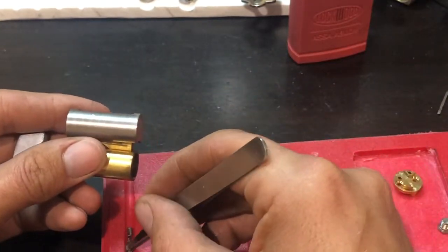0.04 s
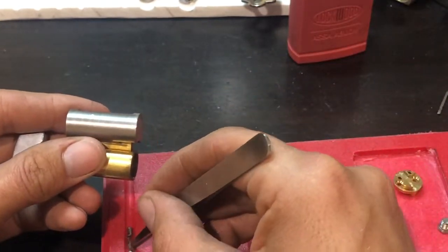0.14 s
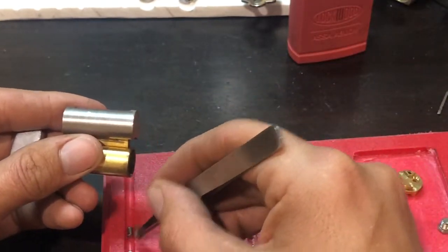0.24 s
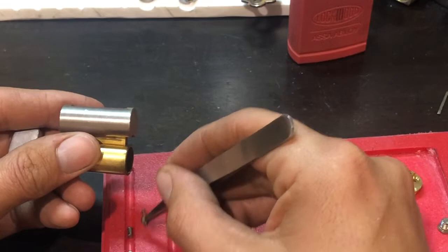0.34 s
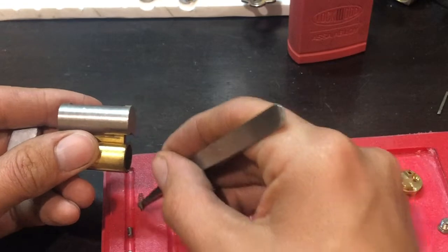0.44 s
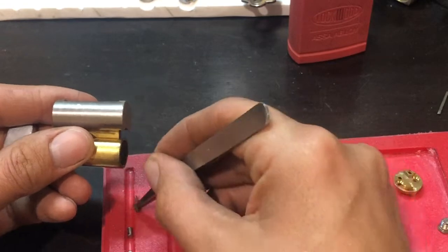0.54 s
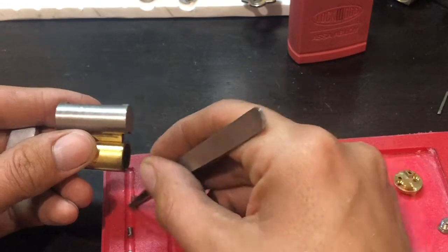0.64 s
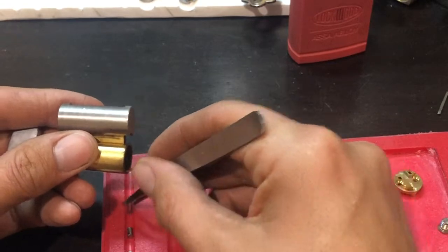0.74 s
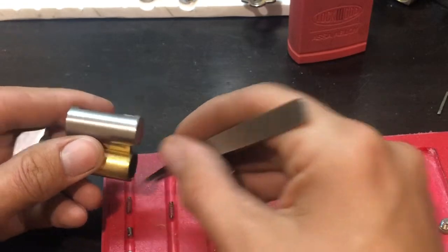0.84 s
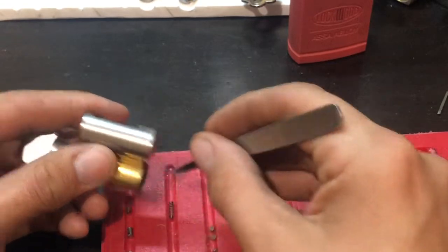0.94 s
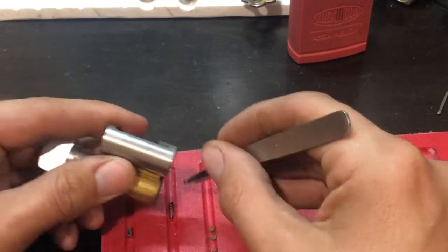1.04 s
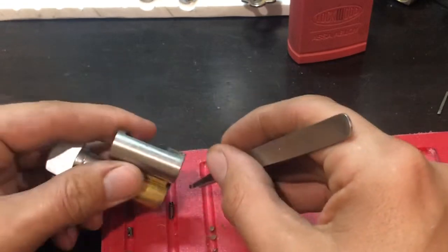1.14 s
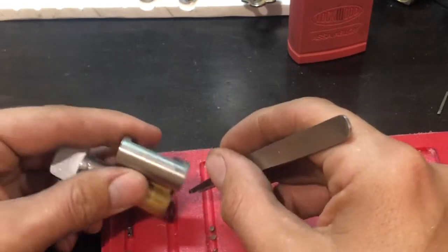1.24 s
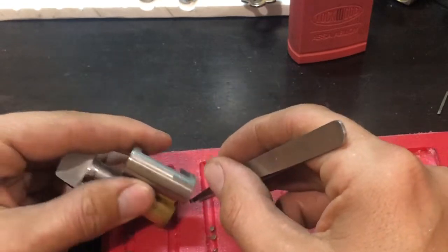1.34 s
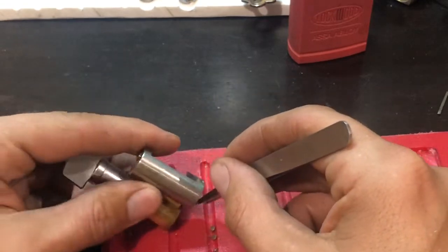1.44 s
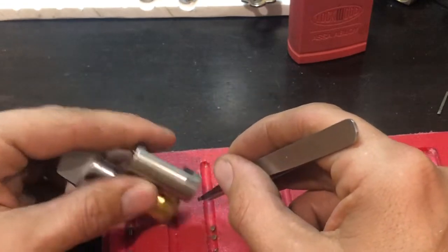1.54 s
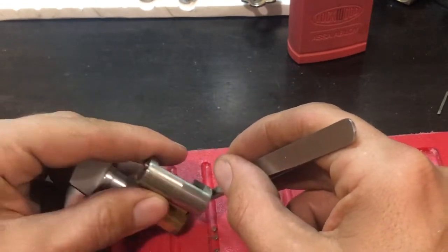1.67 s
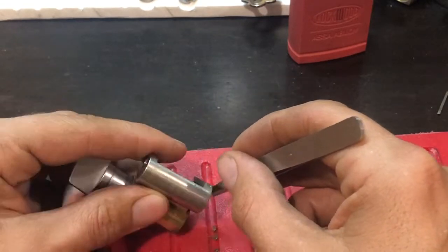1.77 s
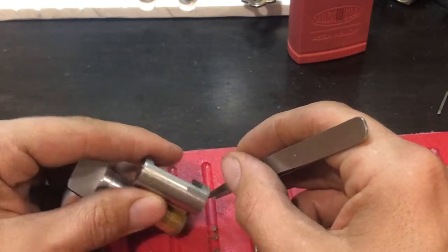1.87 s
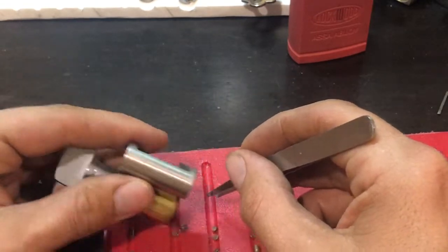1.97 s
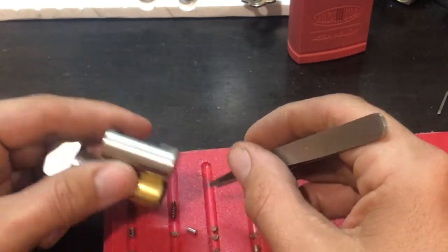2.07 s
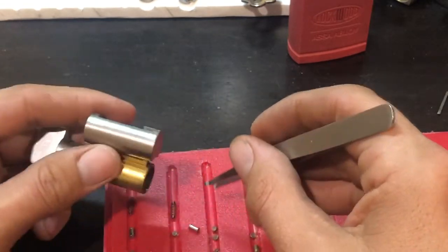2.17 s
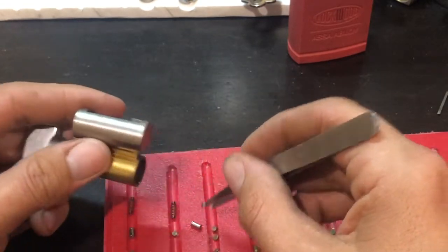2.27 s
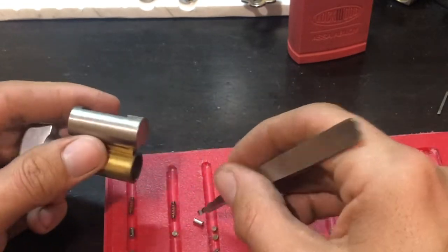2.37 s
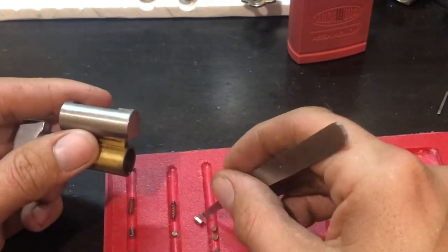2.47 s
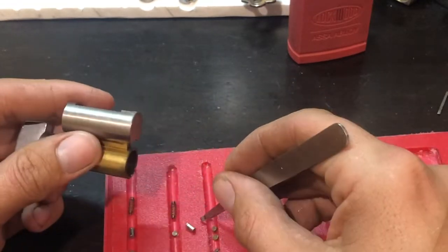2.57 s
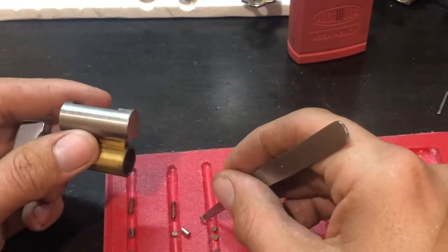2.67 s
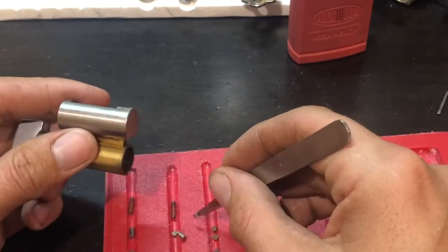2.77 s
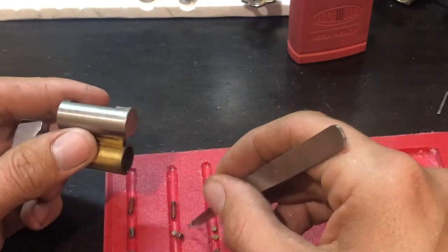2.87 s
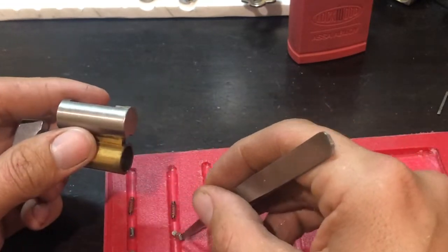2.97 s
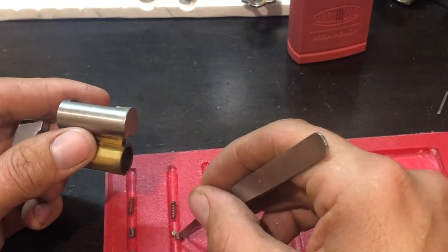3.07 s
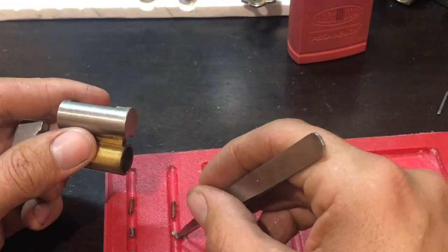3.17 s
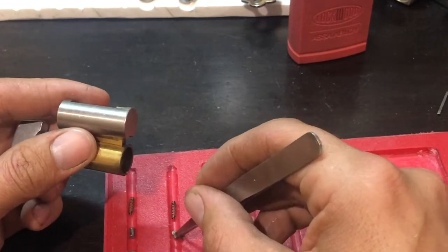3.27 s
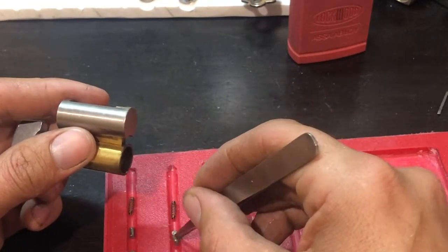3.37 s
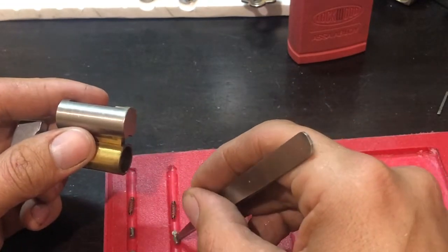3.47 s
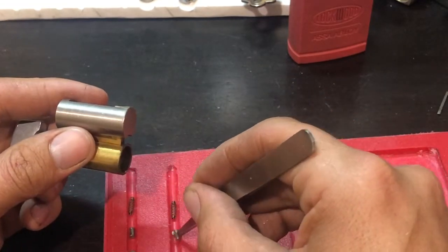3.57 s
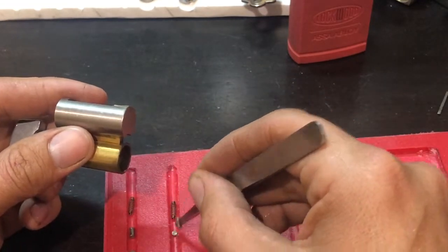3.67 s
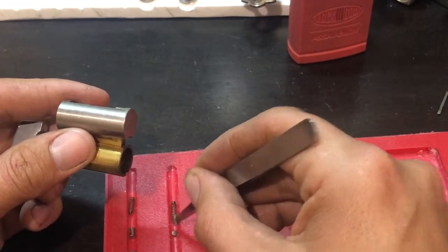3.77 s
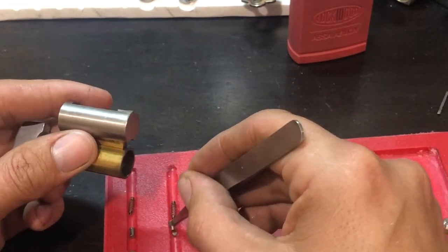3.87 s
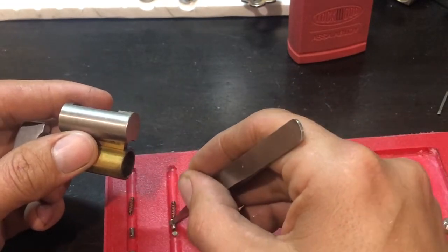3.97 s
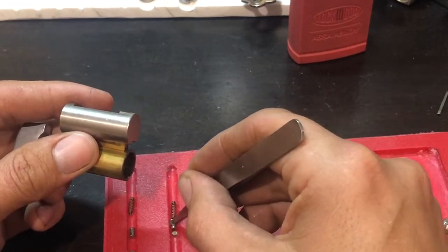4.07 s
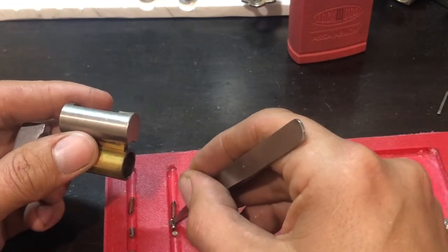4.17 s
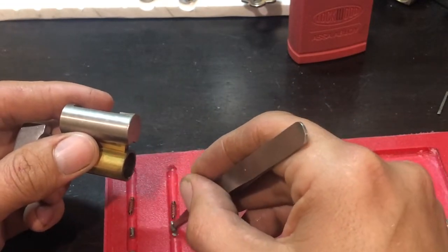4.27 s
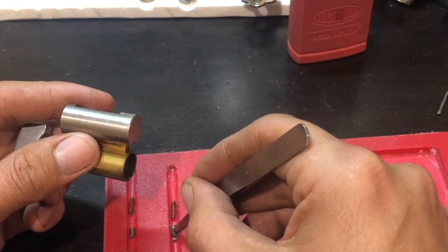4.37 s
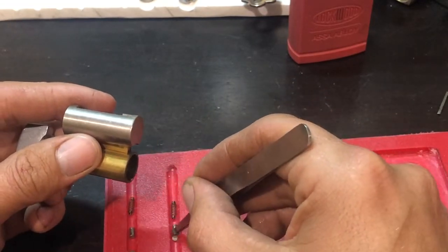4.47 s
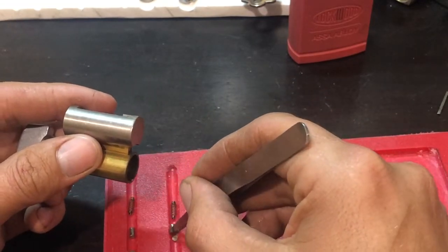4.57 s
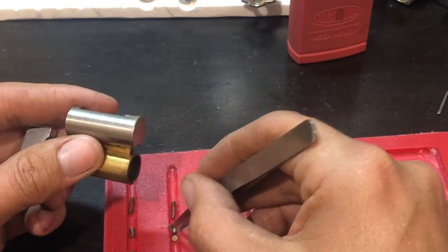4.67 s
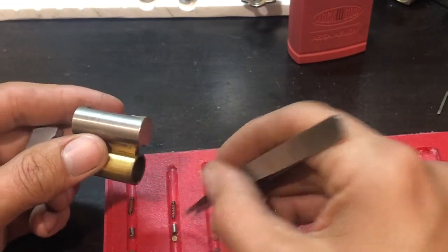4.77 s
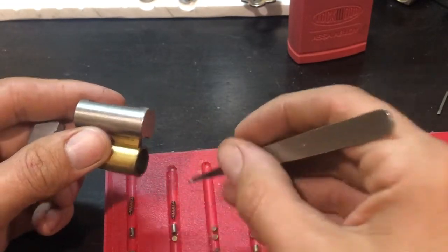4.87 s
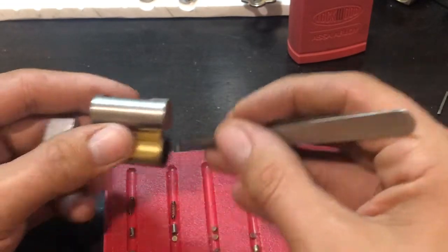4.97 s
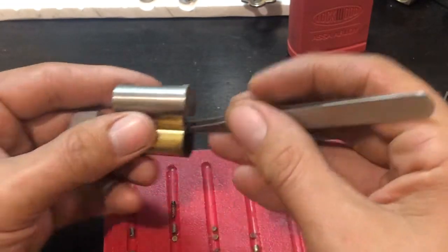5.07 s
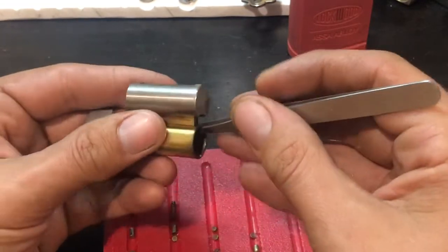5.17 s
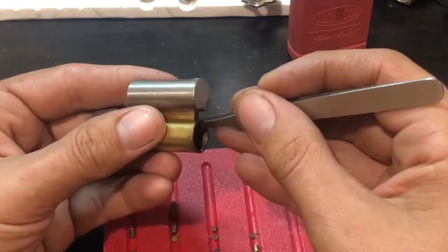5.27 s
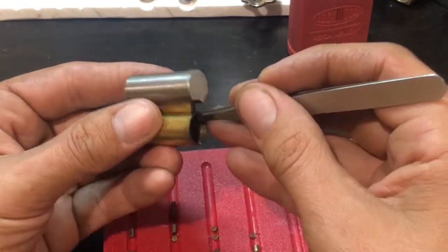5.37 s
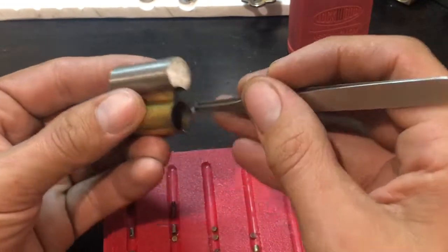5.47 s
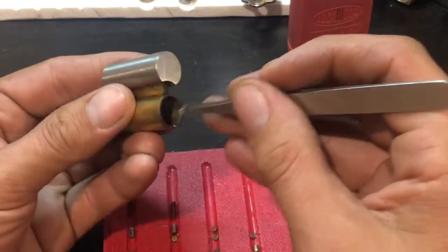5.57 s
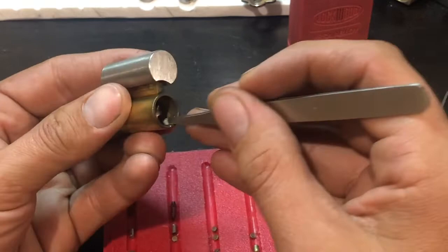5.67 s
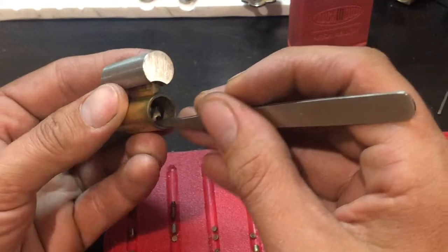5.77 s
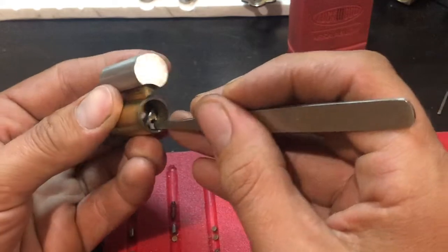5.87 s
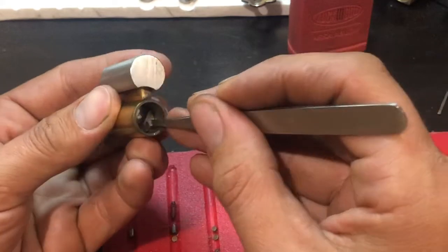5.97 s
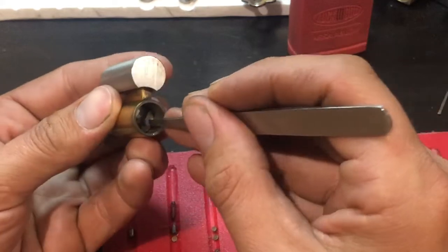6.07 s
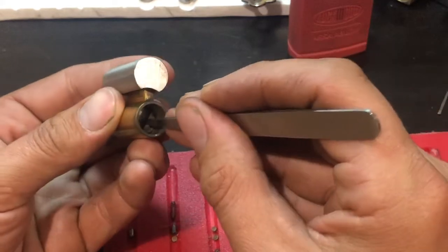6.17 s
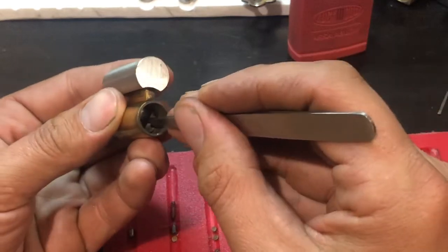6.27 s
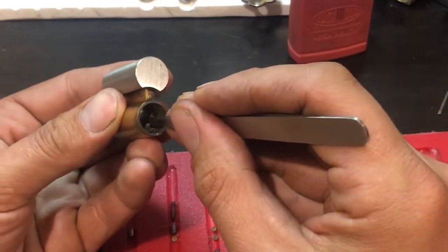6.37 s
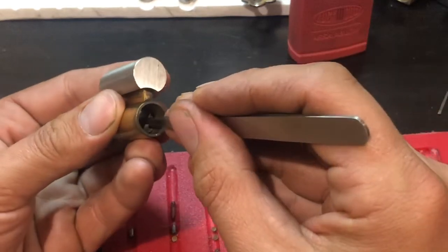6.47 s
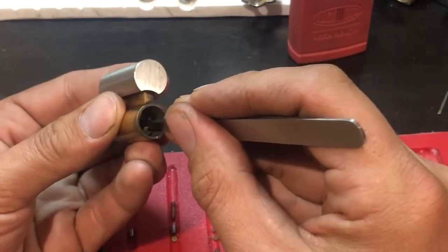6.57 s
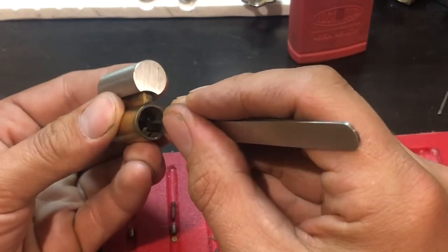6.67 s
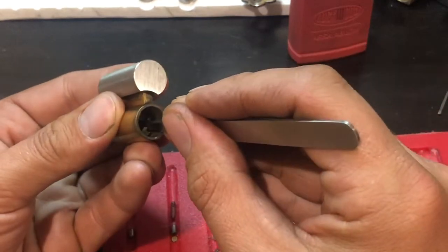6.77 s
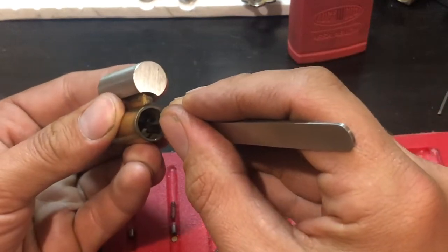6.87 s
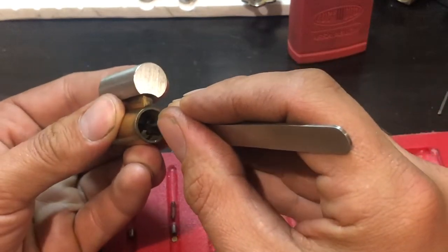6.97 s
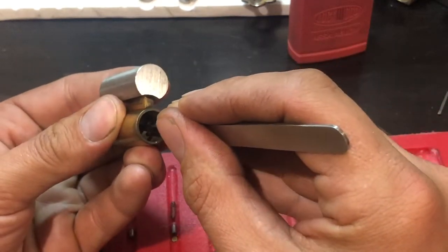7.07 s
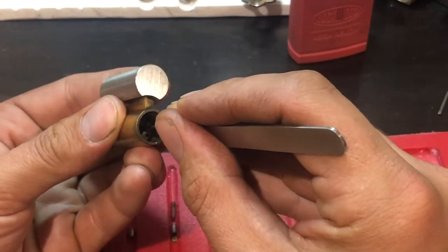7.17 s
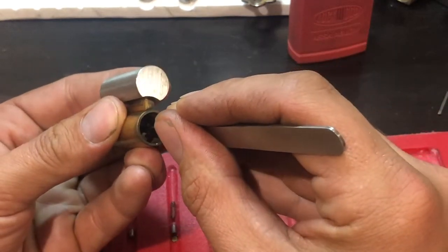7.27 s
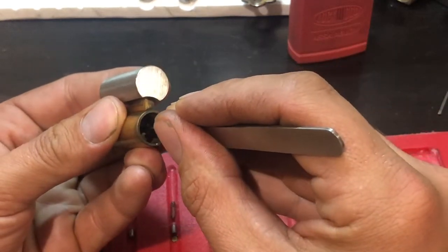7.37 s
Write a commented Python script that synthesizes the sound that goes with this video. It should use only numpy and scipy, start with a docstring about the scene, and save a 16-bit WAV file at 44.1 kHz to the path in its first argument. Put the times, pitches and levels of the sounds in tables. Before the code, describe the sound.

Sharp knocks on a plastic tray and a tiny bouncing pin, followed by sparse, delicate clicks of tweezers on metal.

```python
"""A brass lock cylinder is knocked on a plastic pinning tray, ringing tray and desk, until a pin drops
out and bounces with bright clinks. Steel tweezers then pick at the pins, set one down and probe the
cylinder: their blades ring at each touch and scrape as the tips catch and slip. Fingers rub and rustle.
Close microphone in a small room, with mains hum and the soft rush of a fan."""
import sys
import numpy as np
from scipy import signal
from scipy.fft import rfft, irfft
from scipy.io import wavfile

SR = 44100
rng = np.random.default_rng(int(sys.argv[2]) if len(sys.argv) > 2 else 0)


def output_pcm(signal):
    """Save a mono or channel-first signal as 16-bit PCM at the path in sys.argv[1].

    Samples are clipped to [-1, 1] before scaling.
    """
    pcm = np.clip(np.atleast_2d(signal).T, -1, 1) * 32767
    wavfile.write(sys.argv[1], SR, np.round(pcm).astype(np.int16))


N = 327663

# Blows on the tray. Each row: start in seconds, level in dB, low-pass corner in Hz.
TRAY_BLOWS = [(.549, -45, 2330), (.6117, -51, 1700), (1.3669, -30.5, 850), (1.63, -12, 5030),
              (1.64, -49, 5000), (1.8219, -21, 760), (2.509, -39.5, 131), (2.953, -45.5, 220),
              (4.808, -52.5, 2000)]
# Tweezer blades, damped by the fingers. Each row: mode in Hz, relative level in dB, T60 in seconds.
BLADE_MODES = [(4400, 1, 0.022), (4740, -9, 0.018), (6950, 2.5, 0.014), (8650, -39, 0.0085),
               (11350, 2.5, 0.03), (12900, -1, .012), (15800, -15, 0.011)]
# Metal-on-metal contact noise. Each row: frequency in Hz, relative density in dB.
CONTACT_SPECTRUM = [(500, -16), (2500, 1.5), (3700, -5.5), (4900, 5.5), (7000, -4.5), (8500, -1.5),
                    (11000, 1.5), (13000, -1), (14300, -4), (15800, -5), (17000, -4)]


def amp(db):
    """Decibels to gain."""
    return 10 ** (np.asarray(db) / 20)


def unit_rms(x):
    """Scales to rms 1."""
    return x / np.sqrt(np.mean(x ** 2) + 1e-20)


def unit_hit(x):
    """Scales a hit to the energy of 4 ms at rms 1."""
    return x / np.linalg.norm(x) * np.sqrt(.004 * SR)


def at_hz(points, hz):
    """Interpolates a table on a log-frequency axis."""
    points_hz, values = np.transpose(points)
    return np.interp(np.log(hz + 1), np.log(points_hz + 1), values)


def add(mix, start_s, sound):
    """Mixes a sound in at start_s."""
    part = mix[max(round(start_s * SR), 0):][:len(sound)]
    part += sound[:len(part)]


def cut(x, hz, kind, order):
    """Butterworth low-, high- or band-pass."""
    sos = signal.butter(order, np.clip(hz, 10, SR / 2 - 1000), kind, fs=SR, output="sos")
    return signal.sosfilt(sos, x)


def noise(spectrum, size):
    """Noise of a given spectrum, rms 1."""
    gain = amp(at_hz(spectrum, np.fft.rfftfreq(size, 1 / SR)))
    return unit_rms(irfft(rfft(rng.standard_normal(size)) * gain, size))


def drift(rate_hz):
    """Slow random wander, rms 1."""
    gain = np.exp(-(np.fft.rfftfreq(N, 1 / SR) / rate_hz) ** 2)
    return unit_rms(irfft(rfft(rng.standard_normal(N)) * gain, N))


def ring(modes, t):
    """Decaying modes; neighbours alternate in sign, so the ring takes a moment to build."""
    return sum((-1) ** k * amp(db - 60 * t / t60_s) * np.sin(2 * np.pi * hz * t)
               for k, (hz, db, t60_s) in enumerate(modes))


def room(x, echo_db, wet_db, build_s=0.0016):
    """Direct sound, near echoes, then a diffuse tail whose top treble dies first."""
    # Desk top and near objects. Each row: delay in seconds, relative gain.
    echoes = [(.004, 0.16), (.0056, 0.13), (.0092, .2), (0.0116, 0.23)]
    # Room decay. Each row: frequency in Hz, T60 in seconds.
    decay_times = [(130, 0.52), (400, 0.38), (1200, 0.46), (3000, 0.41), (7000, 0.43), (15000, 0.29)]
    near = np.zeros(N)
    for delay_s, gain in echoes:
        add(near, delay_s, gain * x)
    hz, t, spectra = signal.stft(rng.standard_normal(SR), SR, nperseg=256)
    decay = amp(-60 * t / at_hz(decay_times, hz)[:, None])
    tail = signal.istft(spectra * decay, SR, nperseg=256)[1]
    tail *= 1 - np.exp(-(np.arange(len(tail)) / SR / build_s) ** 2)
    diffuse = signal.fftconvolve(x, tail / np.linalg.norm(tail))[:N]
    return x + amp(echo_db) * near + amp(wet_db) * diffuse


def fan_air(level_db=-59, flutter_db=0.5, whine_hz=1870, whine_width_hz=60, whine_db=-23):
    """A soft rush of air with one narrow whine."""
    # Fan air. Each row: frequency in Hz, relative density in dB.
    air_spectrum = [(25, -34), (58, -2.5), (80, -11.5), (140, -1), (215, -2), (275, 0.5), (370, -2),
                    (480, -11), (1000, -8.5), (1500, -14.5), (2700, -15.5), (5000, -24), (12000, -32),
                    (15500, -35.5), (16300, -55)]
    resonance = signal.iirpeak(whine_hz, whine_hz / whine_width_hz, SR)
    whine = unit_rms(signal.lfilter(*resonance, rng.standard_normal(N)))
    gain = amp(level_db + flutter_db * drift(rate_hz=39))
    return gain * (noise(air_spectrum, N) + amp(whine_db) * whine)


def hum(drone_hz=95.5, wander=0.000567, flutter=0.13):
    """Mains and fan motor tones waver; the motor's drone beats against the mains tone just above it."""
    # Mains and motor tones. Each row: frequency in Hz, rms level in dB.
    tones = [(50, -69.5), (100, -72), (150, -73), (200, -86), (269, -71), (300, -78), (328.3, -65),
             (500, -77.5), (700, -82.5), (1857, -79)]
    # Swell of the drone. Each row: time in seconds, rms level in dB.
    drone_levels = [(0, -67), (4.2, -67), (5.8, -64), (6.5, -64.5), (7.4, -68.5)]
    drone_db = np.interp(np.arange(N) / SR, *np.transpose(drone_levels))
    out = np.zeros(N)
    for hz, db in list(tones) + [(drone_hz, drone_db)]:
        cycles = np.cumsum(hz * (1 + wander * drift(rate_hz=3.23))) / SR + rng.random()
        gain = amp(db) * np.sqrt(2) * (1 + flutter * drift(rate_hz=2.5))
        out += gain * np.sin(2 * np.pi * cycles)
    return out


def friction(low_hz, high_hz, order):
    """Friction noise in one band, rms 1."""
    return unit_rms(cut(rng.standard_normal(N), [low_hz, high_hz], "band", order))


def finger_rubs(width_ratio=.35):
    """Swells of friction noise, each in one resonance, over the broad rustle of the hands."""
    # Rustle of the hands. Each row: time in seconds, rms level in dB.
    rustle_levels = [(0, -66.5), (.2, -65), (.45, -77), (3.3, -89), (4.6, -69), (5.1, -64.5), (5.6, -73.5),
                     (6.59, -82), (6.61, -56.5), (6.72, -76), (7.4, -82)]
    # Fingers on tray and cylinder. Each row: middle and length in seconds, level in dB, centre in Hz.
    rubs = [(0.097, .56, -76, 4030), (3.36, .14, -56.5, 273), (3.925, 0.077, -60, 265),
            (4.293, 0.076, -59, 680), (5.745, .3, -72, 4420)]
    t = np.arange(N) / SR
    rustle_db = np.interp(t, *np.transpose(rustle_levels))
    out = amp(rustle_db) * friction(low_hz=850, high_hz=2220, order=1)
    for middle_s, length_s, db, hz in rubs:
        swell = np.cos(np.pi * np.clip((t - middle_s) / length_s, -.5, .5))
        half_width_hz = hz * width_ratio / 2
        out += amp(db) * swell * friction(hz - half_width_hz, hz + half_width_hz, order=2)
    return out


def tweezer_scrapes(slips_per_s=1400, slip_s=0.0011, blades_db=-7):
    """Sliding tips catch and slip; the slips ring the blades."""
    # Tips sliding on metal. Each row: middle and length in seconds, level in dB, high-pass corner in Hz.
    scrapes = [(0.087, 0.046, -70, 11000), (3.468, 0.019, -57, 8000), (4.69, .08, -75, 13100),
               (5.038, 0.035, -58, 4000), (5.079, 0.29, -72, 6630), (5.394, .075, -56.5, 2400),
               (5.707, .05, -71, 10000), (5.925, 0.09, -69, 3200), (6.61, 0.045, -67, 1500)]
    out, t = np.zeros(N), np.arange(SR // 10) / SR
    for middle_s, length_s, db, highpass_hz in scrapes:
        size = int(length_s * SR)
        slips = (rng.random(size) < slips_per_s / SR) * rng.exponential(1, size)
        grit = noise(CONTACT_SPECTRUM, size) * signal.fftconvolve(slips, np.exp(-t / slip_s))[:size]
        blades = signal.fftconvolve(grit, ring(BLADE_MODES, t))[:size]
        stroke = cut(unit_rms(grit) + amp(blades_db) * unit_rms(blades), highpass_hz, "high", order=2)
        add(out, middle_s - length_s / 2, amp(db) * unit_rms(stroke) * np.hanning(size))
    return out


def tweezer_ticks(blades_db=-9, scatter_db=8.5, part_db=-12, part_t60_cycles=140):
    """A snap of contact rings the touched part and the blades, differently at each grip."""
    # Tips touching pins and brass. Each row: start in seconds, level in dB, high-pass corner in Hz,
    # pitch of the touched part in Hz.
    touches = [(.2505, -61, 9000, 12700), (.549, -57, 3850, 9800), (.681, -58, 9500, 13000),
               (0.996, -57, 7000, 8240), (1.673, -33.5, 6640, 9700), (1.676, -43, 7500, 12200),
               (2.4649, -50.5, 800, 4500), (2.473, -61, 4000, 9300), (3.3456, -50.5, 6500, 3020),
               (3.388, -54, 3500, 3140), (3.4618, -36.5, 5000, 3083), (3.4629, -39, 12000, 15200),
               (4.3075, -69, 9000, 12000), (4.5402, -53, 8460, 11500), (5.023, -50.5, 5500, 11300),
               (5.147, -40.5, 1760, 2440), (5.2576, -54.5, 5000, 11800), (5.667, -55.5, 6000, 13700),
               (6.2034, -62, 8000, 11200)]
    ref_snap_s, ref_db, halving_db = 0.0022, -41, 39
    out, t = np.zeros(N), np.arange(SR // 5) / SR
    for start_s, db, highpass_hz, part_hz in touches:
        snap_s = ref_snap_s * .5 ** ((db - ref_db) / halving_db)  # firmer touches are shorter
        snap = unit_hit(noise(CONTACT_SPECTRUM, len(t)) * np.exp(-t / snap_s))
        gripped_modes = [(hz, mode_db - scatter_db * rng.standard_normal(), t60_s)
                         for hz, mode_db, t60_s in BLADE_MODES]
        blades = unit_hit(ring(gripped_modes, t))
        tick = unit_hit(cut(snap + amp(blades_db) * blades, highpass_hz, "high", order=2))
        part = unit_hit(ring([(part_hz, 0, part_t60_cycles / part_hz)], t))
        add(out, start_s, amp(db) * (tick + amp(part_db) * part))
    return out


def pin_bounces(count=5, first_s=2.034, first_db=-38, flight_s=.023, rebound=.665, step_db=-4.5):
    """The dropped pin lands ever sooner and softer. Each row: start in seconds, level in dB."""
    return [(first_s + flight_s * np.sum(rebound ** np.arange(k)), first_db + step_db * k)
            for k in range(count)]


def pin_clinks(jolt_db=-19.5, jolt_lead_s=0.0019, detune=0.013, grit_db=-7, grit_s=0.003, top_hz=8000):
    """Pins clink as blows jolt them and as one rattles and bounces; each contact rings differently."""
    # Loose pin rattling on brass. Each row: start in seconds, level in dB.
    rattles = [(1.663, -41), (1.667, -39), (1.7887, -56), (1.829, -47), (1.8384, -41.5), (2.0542, -48),
               (2.7635, -62.5)]
    # Pin against the cylinder. Each row: mode in Hz, relative level in dB, T60 in seconds.
    pin_modes = [(3190, -20, 0.068), (4350, -4, 0.0063), (5920, 2, 0.0057), (6400, 3, 0.013),
                 (7600, -6.5, 0.0057), (10500, -6, 0.0042), (13200, -19, 0.0076)]
    jolts = [(start_s - jolt_lead_s, db + jolt_db) for start_s, db, _ in TRAY_BLOWS]
    out, t = np.zeros(N), np.arange(SR // 10) / SR
    for start_s, db in jolts + list(rattles) + pin_bounces():
        pitch_ratio = 1 + detune * rng.standard_normal()
        tone = unit_hit(ring(pin_modes, t * pitch_ratio))
        contact = cut(noise(CONTACT_SPECTRUM, len(t)), top_hz, "low", order=1)
        grit = unit_hit(contact * np.exp(-t / grit_s))
        add(out, start_s, amp(db) * unit_hit(tone + amp(grit_db) * grit))
    return out


def tray_knocks(crack_db=-4.5, crack_s=0.0057, rise_s=0.00009, highpass_ratio=0.048):
    """Each blow rings tray and desk with a plastic crack; harder, shorter blows have less bass."""
    # Tray on the desk. Each row: mode in Hz, relative level in dB, T60 in seconds.
    tray_modes = [(135.5, -7, 0.45), (148, -12.5, 0.2), (253.7, -19.5, 0.42), (275, -10.5, 0.17),
                  (372, -3, 0.092), (476, -5.5, 0.065), (581, -11, 0.078), (715, -2, 0.03), (824, 4, 0.024),
                  (901, 6, 0.021), (1058, -4.5, 0.077), (1157, -3.5, 0.057), (1260, 0.5, 0.025),
                  (1575, -6, 0.068), (1664, 6.5, 0.0082), (1824, 9, 0.011), (2350, 2, 0.0091),
                  (2620, -49, 0.012), (2730, 0, 0.012), (3115, -1.5, 0.017), (3990, -8, 0.022),
                  (5470, -15, .01)]
    # Crack of the plastic. Each row: frequency in Hz, relative density in dB.
    crack_spectrum = [(100, 0), (400, 4.5), (1100, 8.5), (1900, -10), (3000, -5), (4000, -12.5),
                      (7000, -12.5), (11000, -17), (16000, -49)]
    out, t = np.zeros(N), np.arange(SR) / SR
    body = unit_hit(ring(tray_modes, t))
    crack_envelope = np.exp(-t / crack_s) * (1 - np.exp(-t / rise_s))
    for start_s, db, lowpass_hz in TRAY_BLOWS:
        crack = unit_hit(noise(crack_spectrum, SR) * crack_envelope)
        blow = cut(body + amp(crack_db) * crack, lowpass_hz, "low", order=1)
        blow = cut(blow, highpass_ratio * lowpass_hz, "high", order=1)
        add(out, start_s, amp(db) * unit_hit(blow))
    return out


def scene(tray_highpass_hz=104):
    """The tray fills the room but radiates no deep bass; the small metal parts are close and drier."""
    knocks = room(cut(tray_knocks(), tray_highpass_hz, "high", order=5), echo_db=-3.0, wet_db=-7.5)
    pins = room(pin_clinks(), echo_db=-5.0, wet_db=-17.5)
    tweezers = room(tweezer_ticks() + tweezer_scrapes(), echo_db=-2, wet_db=-14.5)
    return (knocks + pins + tweezers + finger_rubs() + hum() + fan_air())[None]


def record(dry):
    """Microphone bass roll-off, then a steep treble limit."""
    highpass_hz, lowpass_hz = 36, 16200
    thinned = cut(dry, highpass_hz, "high", order=4)
    lowpass = signal.firwin(301, lowpass_hz, window=("kaiser", 9), fs=SR)
    return signal.oaconvolve(thinned, lowpass[None], "same")


dry = scene()
out = record(dry)
output_pcm(out)
```